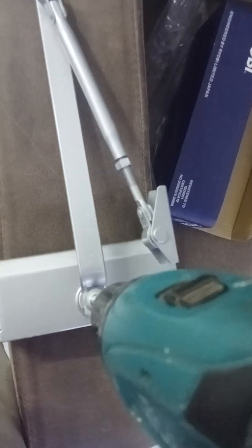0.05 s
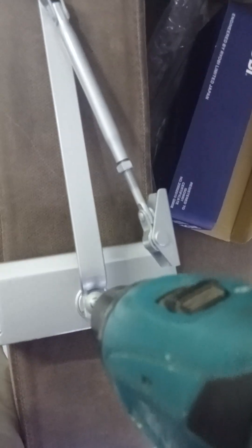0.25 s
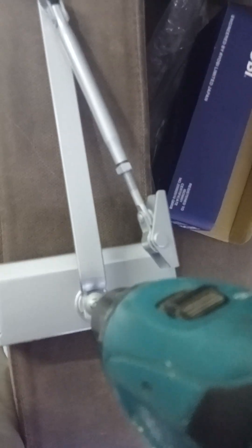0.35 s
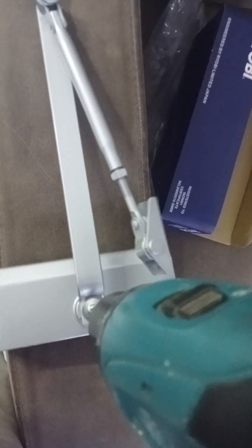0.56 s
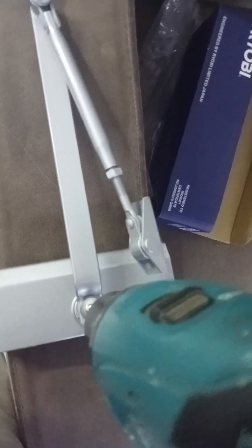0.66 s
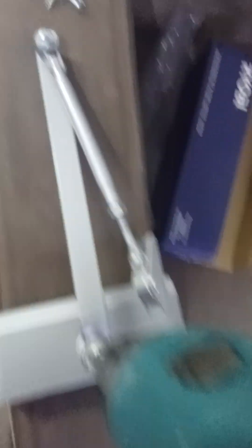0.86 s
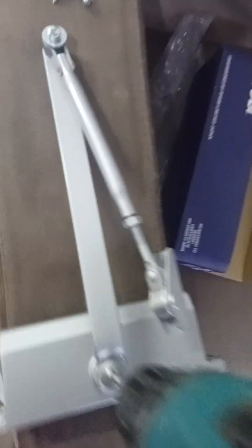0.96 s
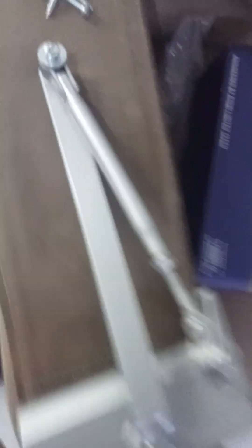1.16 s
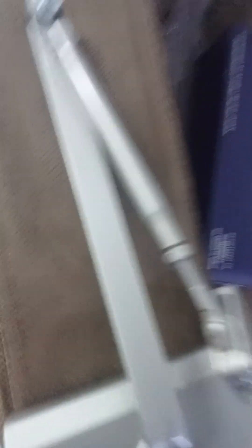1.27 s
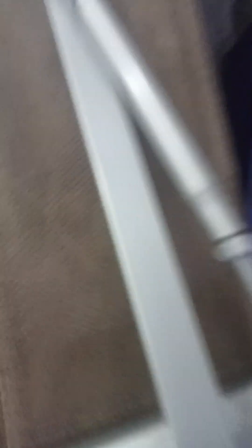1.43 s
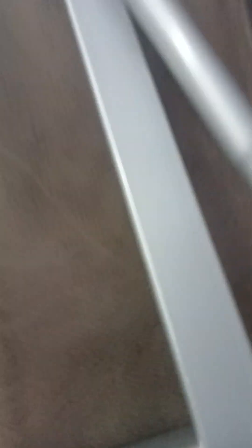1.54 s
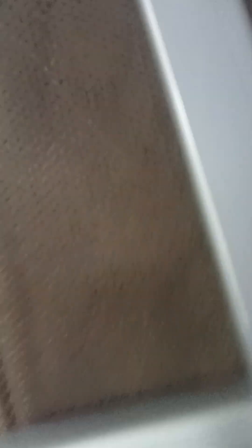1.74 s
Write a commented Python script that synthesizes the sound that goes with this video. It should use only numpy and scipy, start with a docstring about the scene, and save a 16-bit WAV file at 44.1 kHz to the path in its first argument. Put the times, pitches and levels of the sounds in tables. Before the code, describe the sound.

Close cordless drill driving a screw into metal, clutch ratcheting, followed by light handling knocks.

```python
"""A cordless drill drives a screw into the metal arm of a door closer, close by in a small live room.
First the gears clack into motion and whir, and the drill's case groans as the screw draws tight.
Then the clutch slips seven times, and each blow sets plastic and steel parts ringing.
Next the bit sticks and slips in the screw head, creaking until it comes free and slides over the arm.
Last come a few scrapes, taps and knocks as the drill is moved away."""
import sys
import numpy as np
from scipy import signal
from scipy.fft import rfft, irfft
from scipy.io import wavfile
from scipy.ndimage import uniform_filter1d

SR = 44100
rng = np.random.default_rng(int(sys.argv[2]) if len(sys.argv) > 2 else 0)


def master(y):
    """Save y as 16-bit WAV."""
    cut = np.clip(np.atleast_2d(y).T, -1, 1)
    pcm = np.round(cut * 32767)  # scale
    wavfile.write(sys.argv[1], SR, pcm.astype(np.int16))


N = 79380
T = np.arange(N) / SR

# The tone of the background. Each row: frequency in Hz, level in dB.
BACKGROUND_TONE = [(25, -93), (55, -14), (85, -9), (118, -1), (150, -9.5), (300, -4), (700, -7.5),
                   (1300, -15), (3200, -23.5), (4200, -22.5), (6200, -35), (7800, -22.5), (9800, -37)]
# How long the room echoes. Each row: frequency in Hz, seconds to fade by 60 dB.
ECHO_TIMES = [(150, 0.64), (1000, 0.55), (4500, 0.74), (8000, 0.42), (15000, 0.48)]
# Light metal taps. Each row: start in seconds, level in dB, centre in Hz, width in Hz, fade in seconds.
METAL_TAPS = [(0.1657, -45, 6000, 8000, 0.0017), (1.104, -26.5, 6220, 1900, .0019),
              (1.106, -27, 10700, 594, .0021), (1.1205, -33, 7660, 5000, 0.0016),
              (1.1418, -21.5, 3050, 4400, 0.00062), (1.3975, -34.5, 3200, 7800, 0.0011),
              (1.4428, -28.5, 3200, 3000, 0.00085)]
# Scrapes of tool and hand. Each row: peak time, rise and fade in seconds, level in dB.
HAND_SCRAPES = [(1.244, 0.0093, 0.011, -21), (1.41, 0.0079, 0.0034, -40), (1.443, 0.009, 0.0049, -25.5)]
# The tone of a scrape. Each row: frequency in Hz, level in dB.
SCRAPE_TONE = [(120, -7), (700, -9), (2000, -7.5), (3500, -5), (6000, -1.5), (8200, 5), (10000, -4.5),
               (14500, 0)]
# The faint rustle of handling. Each row: time in seconds, level in dB.
RUSTLE_LEVELS = [(.9, -53), (1.06, -50.5), (1.125, -48.5), (1.153, -33), (1.2, -42), (1.29, -52.5),
                 (1.35, -68), (1.48, -51.5), (1.6, -54), (1.75, -53.5)]
# The tone of that rustle. Each row: frequency in Hz, level in dB.
RUSTLE_TONE = [(100, -24), (300, 2.5), (1000, -4), (5000, -2.5), (7500, -0.5), (9500, -7), (14500, -11)]
# Soft handling knocks. Each row: start in seconds, level in dB, pitch in Hz, fade in seconds.
SOFT_KNOCKS = [(1.136, -29.5, 164, 0.0053), (1.4317, -23.5, 176, 0.0038)]
# The bit creaking out of the screw. Each row: time in seconds, slips per second, level in dB.
CREAK_PATH = [(1.0, 97, -52), (1.03, 93.6, -44), (1.06, 90.4, -46.5), (1.08, 109, -41), (1.118, 99, -40.5),
              (1.141, 215, -32.5), (1.158, 88, -56)]
# The tone of one slip of the bit. Each row: frequency in Hz, level in dB.
CREAK_TONE = [(50, -30.5), (100, -4), (215, 8), (300, 1), (500, -9), (1500, -15), (8000, -29)]
# The bit ringing in the screw head. Each row: start and hold in seconds, squeak and top ring in dB.
BIT_RINGS = [(0.585, 0.01, -32, -44), (0.68, .0064, -51, -40), (0.735, 0.0041, -19, -36),
             (0.766, 0.0085, -28.5, -30), (.789, 0.0082, -22, -41), (0.817, 0.015, -33, -34),
             (.859, 0.02, -26, -41)]
# The bit's own notes. Each row: pitch in Hz, level in dB.
BIT_NOTES = [(8430, 3), (8570, -14), (11850, -11)]
# The motor's speed, before surges. Each row: time in seconds, shaft turns per second.
MOTOR_SPEED = [(.24, 109.1), (.28, 221), (.32, 277.1), (.38, 295.4), (.45, 303.2), (.5, 293), (.53, 271.5),
               (.565, 120.7), (.85, 106.9), (.97, 97)]
# How loud the gears are. Each row: time in seconds, growl in dB, hiss in dB.
GEAR_LEVELS = [(.238, -51, -52), (.246, -25, -38), (.275, -30, -34), (.325, -26, -27), (.38, -23.5, -24),
               (.536, -22, -26), (.565, -47, -43), (.7, -37.5, -38.5), (.86, -41, -34.5), (.94, -76, -54)]
# The tone of the gears' growl. Each row: frequency in Hz, level in dB.
GROWL_TONE = [(88, -55), (150, -40), (292, -18.5), (423, -12), (590, -6), (674, -8), (891, -3), (1280, -3),
              (2110, 0), (2320, -5.5), (3600, -11), (4680, -76)]
# The tone of the gears' hiss. Each row: frequency in Hz, level in dB.
HISS_TONE = [(2500, -24), (3700, -7.5), (4700, -1.5), (5650, 2.5), (6300, 0), (7200, -1.5), (8700, -2.5),
             (10900, -12), (14200, -8.5)]
# The notes of the whine. Each row: multiple of the shaft speed, dB added to the growl level.
WHINE_NOTES = [(1, -18.5), (2, -22.5), (3, -11.5), (5.3, -8), (7, -14.5), (18.5, -32)]
# Three gear clacks, then seven clutch slips. Each row: start in seconds, blow in dB, seconds until the
# rebound, rebound in dB, extra dB for the body, then pitch in Hz and extra dB for each of case, arm, steel.
CLACK_HITS = [(0.2422, -16, 0.0043, -15, 3.5, 524, 5, 1380, 3.5, 8570, -2),
              (0.2517, -25, 0.0067, -25, 8.5, 1330, -1, 700, 8, 8400, 2),
              (.2938, -20.5, 0.0018, -27, -4, 282, 6, 920, 9.5, 8300, -11),
              (0.5709, -10, 0.0041, -14.5, 4, 1176, 0.5, 2260, 0.5, 7500, -3),
              (.6221, -11.5, 0.0043, -20.5, 0.5, 1600, 2, 2070, 2.5, 8130, 1),
              (0.6689, -12, .00425, -16.5, -5, 750, -2, 1340, -2, 8500, 1),
              (0.712, -11, 0.00427, -12.5, 1, 1470, -3, 2480, -2, 7760, 0.5),
              (0.7558, -10.5, 0.0046, -12, 1, 1320, 3.5, 1070, -3.5, 6470, -4.5),
              (.7970, -10, 0.0032, -14.5, -2, 600, -2, 2470, 5.5, 8150, -5),
              (0.8415, -13.5, 0.0054, -10, -3, 660, 0.5, 1480, 2.5, 5550, -3.5)]
# The tone of a sharp crack, also used for the bit's rub. Each row: frequency in Hz, level in dB.
CRACK_TONE = [(300, -55), (1500, -4.5), (2500, -3), (3500, 0.5), (6000, -1), (8000, 3.5), (11000, -5),
              (14000, -5.5)]
# The tone of the drill's body when struck. Each row: frequency in Hz, level in dB.
BODY_TONE = [(90, -22.5), (220, 1.5), (350, -6), (560, 1), (800, 0), (1650, 4), (2300, -9), (4000, -14)]

SEATED_S = .55  # the screw is tight from here on


def amp(db):
    """Turn decibels into a multiplier."""
    return 10 ** (np.asarray(db) / 20)


def unit(x):
    """Scale a signal to an average power of one."""
    return x / np.sqrt(np.mean(x ** 2) + 1e-20)


def curve(rows, column=1):
    """One column of a table, joined by straight lines in time."""
    rows = np.array(rows)
    return np.interp(T, rows[:, 0], rows[:, column])


def value_at(points, hz):
    """Look up a table's value at any frequency."""
    f, value = np.transpose(points)
    return np.interp(np.log(hz + 1), np.log(f + 1), value)


def noise():
    """Plain white hiss."""
    return rng.standard_normal(N)


def drift(seconds):
    """Random wandering of size one; more seconds make it slower."""
    size = max(2, int(seconds * SR))
    return unit(uniform_filter1d(uniform_filter1d(noise(), size), size))


def colour(x, tone):
    """Give a sound the tone in a table, with a filter that rings only after each hit."""
    db = value_at(tone, abs(np.fft.fftfreq(4096, 1 / SR)))
    log_gain = np.log(amp(np.maximum(db, -100)))
    taps = np.fft.ifft(np.exp(np.conj(signal.hilbert(log_gain)))).real[:2048]
    return signal.fftconvolve(x, taps / np.linalg.norm(taps))[:N]


def band(hz, width_hz):
    """Noise gathered around one pitch."""
    f = np.fft.rfftfreq(N, 1 / SR)
    distance = (f - hz * hz / (f + 1)) / width_hz
    return unit(irfft(rfft(noise()) / (1 + distance ** 2 / 2), N))


def burst(start, rise, fall, hold=0):
    """A level that rises, holds and dies away; all times are in seconds."""
    t = T - start
    return np.clip(t / rise, 0, 1) * np.exp(-np.maximum(t - rise - hold, 0) / fall)


def background():
    """A steady low rumble with a slight flutter."""
    return amp(-48) * unit(colour(noise() * amp(0.79 * drift(0.0067)), BACKGROUND_TONE))


def room_echo(x):
    """Sound bounces off nearby surfaces, then blurs into a fading tail."""
    hz, t, spectrum = signal.stft(noise(), SR, nperseg=256)
    fade = amp(-60 * t / value_at(ECHO_TIMES, hz)[:, None])
    tail = signal.istft(spectrum * fade, SR, nperseg=256)[1][:N]
    tail *= np.clip((T - .004) / 0.0018, 0, 1)
    early = noise() * (rng.random(N) < .05) * burst(0.0017, 0.00039, fall=0.011)
    echo = amp(-12) * tail / np.linalg.norm(tail) + amp(-15) * early / np.linalg.norm(early)
    return signal.fftconvolve(x, echo)[:N]


def handling():
    """Hand and tool tap, scrape, rustle and knock as the drill is lifted away."""
    taps = sum(amp(db) * burst(start, 0.00045, fall) * band(hz, width)
               for start, db, hz, width, fall in METAL_TAPS)
    rub, knocks = np.zeros((2, N))
    for peak, rise, fall, db in HAND_SCRAPES:
        spread = np.where(T < peak, rise / 2, fall / np.sqrt(2))
        rub += amp(db) * np.exp(1 - np.hypot(1, (T - peak) / spread))  # a rounded swell
    grain = unit(amp(2 * drift(0.00031))) * noise()
    scrapes = colour(rub * grain, SCRAPE_TONE)
    rustle = colour(amp(curve(RUSTLE_LEVELS)) * (T > RUSTLE_LEVELS[0][0]) * grain, RUSTLE_TONE)
    for start, db, hz, fall in SOFT_KNOCKS:
        thump = np.sin(2 * np.pi * hz * (T - start)) + amp(-10) * band(310, 330)
        knocks += amp(db) * burst(start, 0.0025, fall) * thump
    return taps + scrapes + rustle + knocks


def bit_creak():
    """The bit sticks and slips unevenly, speeding up until it comes free and slides over the arm."""
    rate = curve(CREAK_PATH) * np.exp(0.096 * drift(.005))
    creaking = (T > CREAK_PATH[0][0]) * (T < CREAK_PATH[-1][0])
    slips = np.diff(np.floor(np.cumsum(rate) / SR), prepend=0) * creaking
    pulses = slips * np.sqrt(SR / rate) * amp(curve(CREAK_PATH, column=2) + noise())
    pulse_tails = signal.lfilter([1], [1, -np.exp(-1 / (0.0012 * SR))], pulses)
    grit = amp(-19.5) * pulse_tails * band(5800, 2200)
    slide = amp(-40) * burst(1.145, rise=0.012, fall=0.035) * band(6600, 260)
    return colour(pulses, CREAK_TONE) + grit + slide


def bit_ring():
    """Between clutch slips the bit chatters in the screw head: its notes waver over a dry rub."""
    notes = unit(sum(amp(db) * np.sin(2 * np.pi * np.cumsum(hz * (1 + .005 * drift(0.0014))) / SR)
                     for hz, db in BIT_NOTES))
    chatter = unit(amp(3 * drift(0.0015)))
    squeak = chatter * (notes + amp(-9) * colour(noise(), CRACK_TONE))
    top_ring = band(15000, 250)
    return sum(burst(start, 0.0016, 0.0049, hold) * (amp(db) * squeak + amp(top_db) * top_ring)
               for start, hold, db, top_db in BIT_RINGS)


def shaft_turns():
    """Count the motor's turns. Each clutch slip frees it: it surges, then sags under the load again."""
    surge_hz = sum(95 * burst(start, 0.00112, fall=.019) for start, *_ in CLACK_HITS if start > SEATED_S)
    waver = 1 + 0.01447 * drift(0.011)
    return np.cumsum((curve(MOTOR_SPEED) + surge_hz) * waver) / SR


def motor():
    """Gear teeth rattle once a turn, loose gears blur the shaft's whine, and the case groans."""
    turns = shaft_turns()
    teeth = unit((1 + 0.11 * np.cos(2 * np.pi * turns)) * amp(drift(0.00037)))
    running = (T > GEAR_LEVELS[0][0]) * (T < GEAR_LEVELS[-1][0])
    whine = np.zeros(N)
    for multiple, db in WHINE_NOTES:
        cycles = multiple * turns + rng.random() + .05 * drift(.004)
        flicker = unit(amp(3.5 * drift(.004)))
        whine += amp(db) * np.sqrt(2) * np.sin(2 * np.pi * cycles) * flicker
    speeding_up = (1 - np.tanh((T - 0.36) / 0.012)) / 2
    tightening = np.exp(-((T - .532) / 0.01) ** 2) / 2
    groan = amp(1) * band(660, 560) * (speeding_up + tightening)
    rattle = amp(-3) * colour(teeth * noise(), GROWL_TONE)
    growl = amp(curve(GEAR_LEVELS)) * (rattle + whine + groan)
    hiss = amp(curve(GEAR_LEVELS, column=2)) * colour(teeth * noise(), HISS_TONE)
    return running * (growl + hiss)


def clacks():
    """Gears and clutch strike and rebound: a crack, then the plastic case, metal arm and steel ring."""
    crack, body, parts, shake = np.zeros((4, N))
    for (start, blow_db, lag, rebound_db, body_db,
         case_hz, case_db, arm_hz, arm_db, steel_hz, steel_db) in CLACK_HITS:
        snap, ring = np.zeros((2, N))
        for hit, db in (start, blow_db), (start + lag, rebound_db):
            snap += amp(db) * burst(hit, rise=.0005, fall=.0012, hold=0.00046)
            ring += amp(db) * burst(hit - 0.00072, rise=0.0013, fall=0.0028)  # the body moves first
        crack += snap
        body += amp(body_db) * ring
        parts += amp(case_db - 7.5) * ring * np.sin(2 * np.pi * case_hz * (T - start))
        parts += amp(arm_db - 8) * ring * band(arm_hz, width_hz=500)
        parts += amp(steel_db - 2) * snap * band(steel_hz, width_hz=580)
        if start > SEATED_S:  # a clutch slip also shakes the whole drill
            shake += amp(max(blow_db, rebound_db)) * burst(start, rise=0.002, fall=0.02)
    cracks = colour(crack * noise(), CRACK_TONE)
    knocks = amp(-5) * colour(body * noise(), BODY_TONE)
    thuds = amp(-20.5) * shake * np.sin(2 * np.pi * shaft_turns())
    return cracks + knocks + parts + thuds


def scene():
    """The drill and the handling share one room; the handling echoes less."""
    drill = motor() + clacks() + bit_ring()
    hands = bit_creak() + handling()
    return (drill + hands + room_echo(drill + amp(-8) * hands) + background())[None]


def record(dry):
    """A small microphone softly overloads on loud clacks; the deep bass and highest treble are cut."""
    ceiling, low_cut_hz, high_cut_hz = 1.06, 48, 15600
    soft = ceiling * np.tanh(dry / ceiling)
    thin = signal.sosfilt(signal.butter(2, low_cut_hz, "high", fs=SR, output="sos"), soft)
    treble_cut = signal.firwin(401, high_cut_hz, window=("kaiser", 8), fs=SR)
    return signal.oaconvolve(thin, treble_cut[None], "same")


dry = scene()
out = record(dry)
master(out)
```